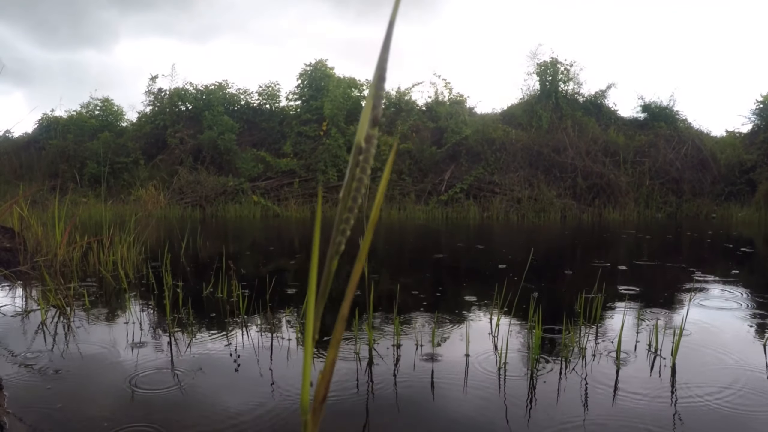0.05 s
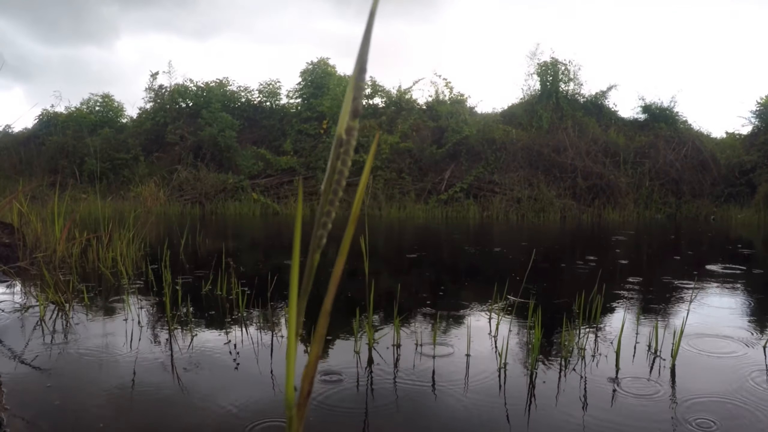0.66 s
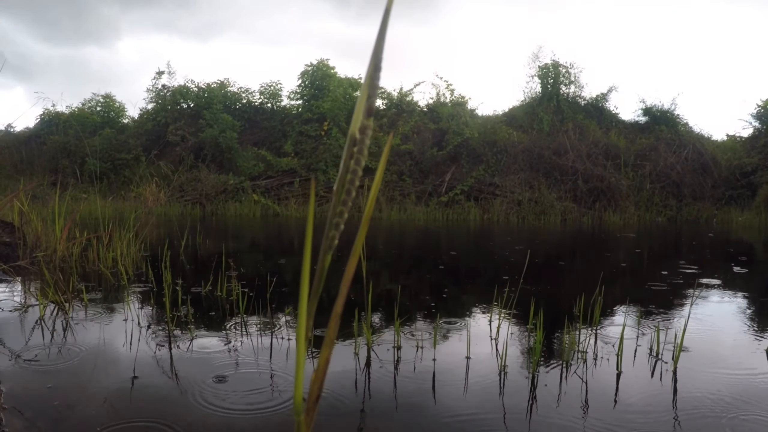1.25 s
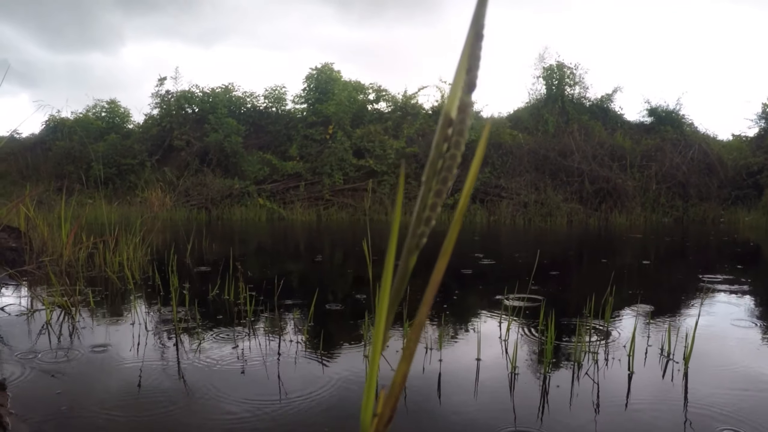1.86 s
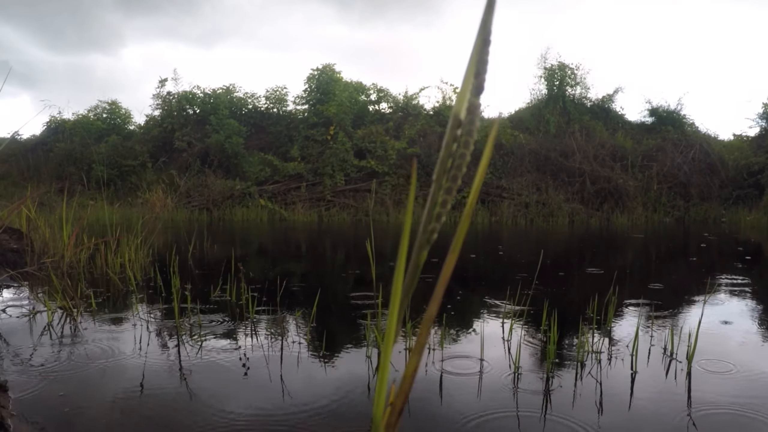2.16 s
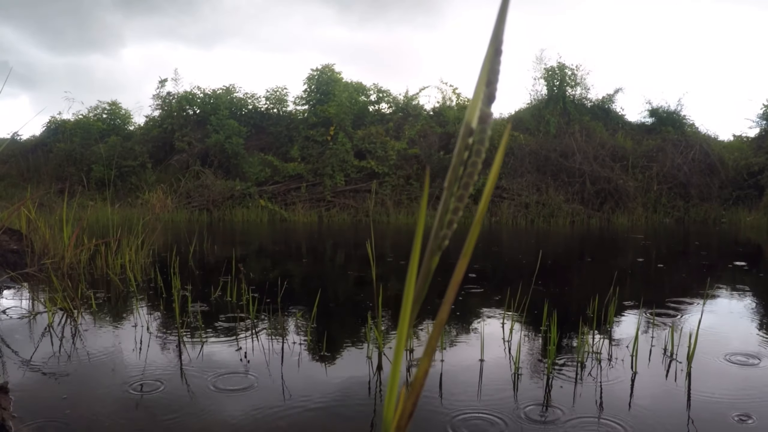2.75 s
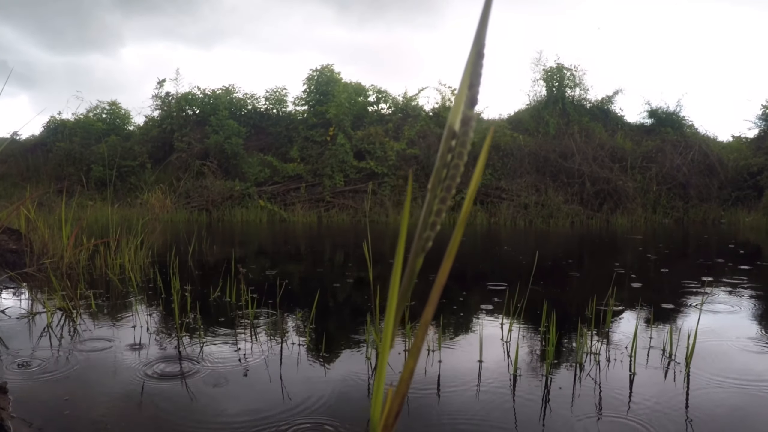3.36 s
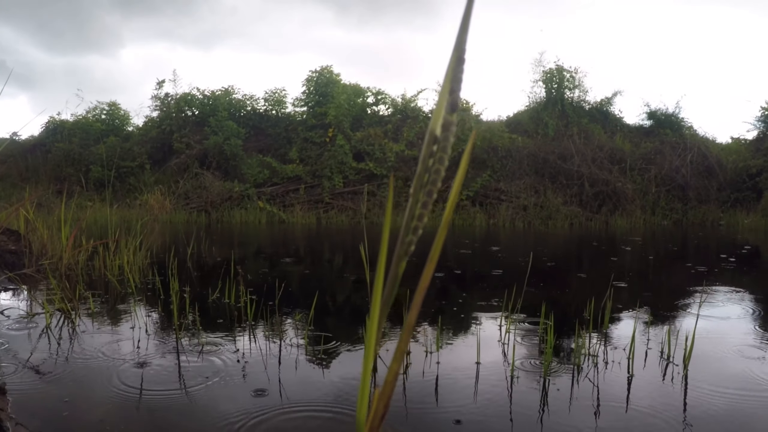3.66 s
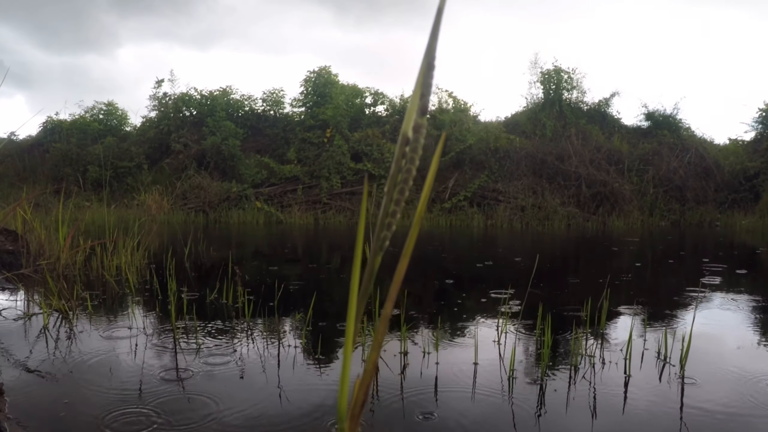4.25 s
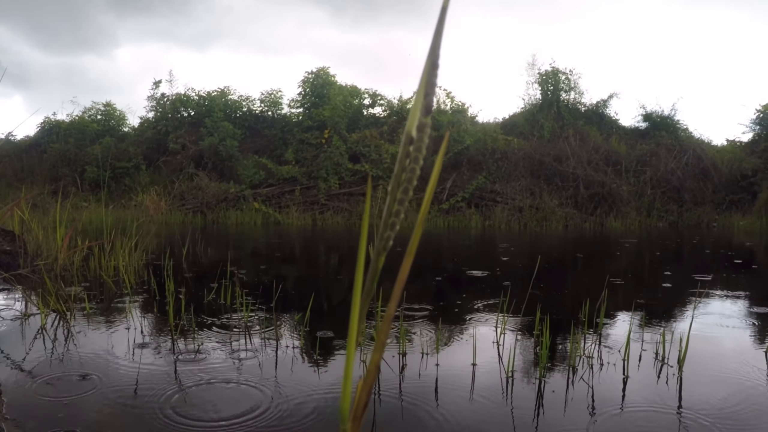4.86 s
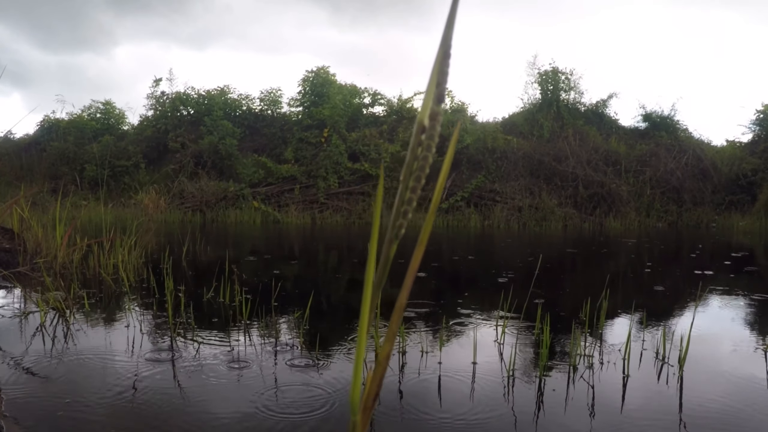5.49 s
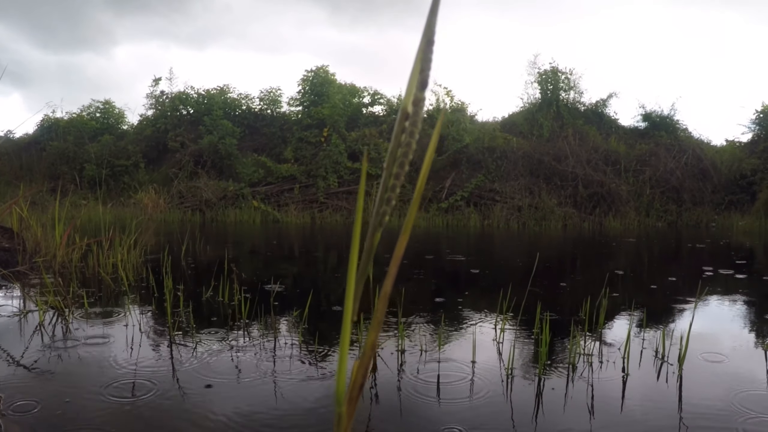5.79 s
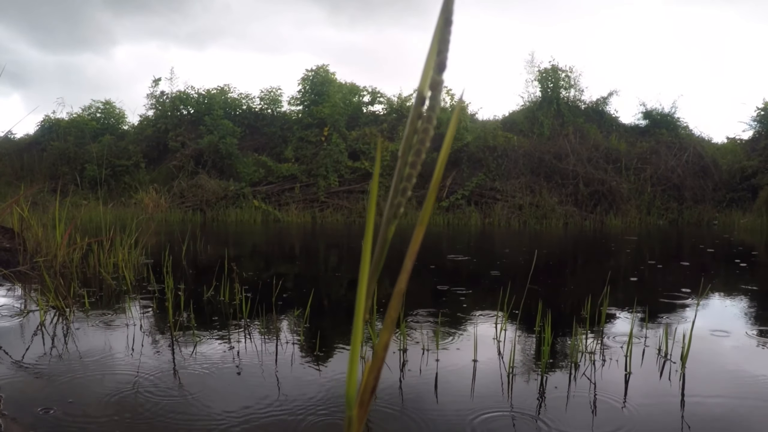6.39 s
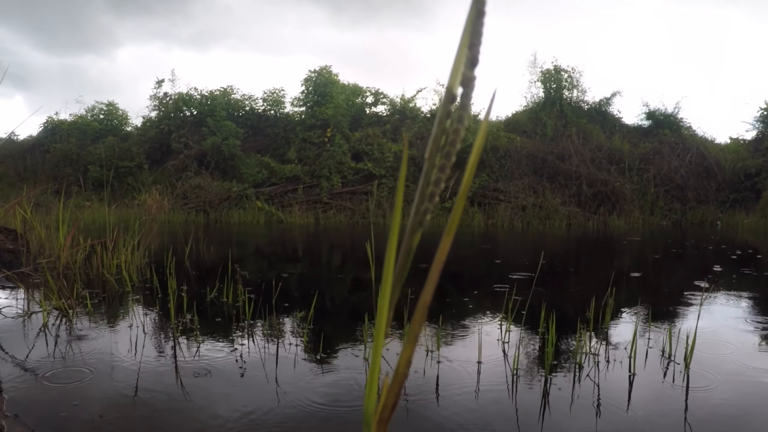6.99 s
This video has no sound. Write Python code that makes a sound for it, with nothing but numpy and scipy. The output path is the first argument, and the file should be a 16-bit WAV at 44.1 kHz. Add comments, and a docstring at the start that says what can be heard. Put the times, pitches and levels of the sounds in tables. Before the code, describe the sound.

Single raindrops plink and splash on a pond close to the microphone, over an even wash of more distant rain. Quiet and sparse at first, with a few papery taps on reeds, the drops soon grow louder and busier and spread out to both sides. A low wind rumble runs underneath, and uneven gusts thump against the microphone, the strongest briefly pushing the rain down.

```python
"""A still pond in light rain, heard from just above the water.
Near drops tick, splash and ring trapped air bubbles; a few tap on reeds; far ones merge into a wash.
A breeze rumbles on the microphone and sheds eddies that thump; the hardest make the limiter duck.
The scene fades in and opens from mono to stereo within the first two seconds."""
import sys
import numpy as np
from scipy import signal
from scipy.fft import rfft, irfft, next_fast_len
from scipy.io import wavfile
from scipy.ndimage import uniform_filter1d, minimum_filter1d, map_coordinates

SR = 44100
rng = np.random.default_rng(int(sys.argv[2]) if len(sys.argv) > 2 else 0)


def digitize_waveform(pressure):
    """Quantize a signal to 16-bit integers and store it at the path in sys.argv[1].

    Rows of a 2-D input are taken as channels; values are limited to [-1, 1].
    """
    field = np.atleast_2d(pressure).T
    bounded = np.clip(field, -1, 1)
    quanta = np.round(bounded * 32767).astype(np.int16)
    wavfile.write(sys.argv[1], SR, quanta)


N = 318843

# strong eddies at the microphone port: t/s, peak/dB, f at peak/Hz, cycles per e-fold of age, ln tail width
STRONG_EDDIES = [(1.709, -5, 110, 1.5, 0.61), (1.722, -17.5, 242, 1.7, 0.65), (1.733, -9, 96, 1.4, 0.4),
                 (2.086, -8.5, 213, 1.06, 0.87), (2.444, 7, 198, 1.23, 0.62), (3.167, -9.5, 165, 1.5, 0.93),
                 (3.178, -12, 133, 2.5, 1), (3.471, -4, 133, 2, 0.59), (3.517, -6, 158, 1.95, 0.49),
                 (3.811, -9, 197, 1.2, 0.7), (3.829, -5, 168, 1.2, 0.79), (4.085, -4.5, 137, 2, 0.44),
                 (4.141, -6.5, 143, 1.4, 0.65), (4.305, -10.5, 192, 2.1, 0.66), (4.595, 2, 330, 1.0, 0.73),
                 (4.64, -3, 184, 1.5, 0.54), (4.69, -15, 222, 1.3, 1), (4.702, -4.5, 232, 1.13, 1),
                 (4.946, -9, 100, 1.5, 0.6), (4.981, -3, 158, 0.82, 1), (5.038, -7.5, 119, 1.8, 0.91),
                 (5.286, -9, 141.5, 1.8, 0.7), (5.316, -6.5, 120, 1.34, 0.8),
                 (5.371, -3.5, 193, 0.68, 0.81), (5.451, -5.5, 347, 3.5, 0.13), (5.46, 7.5, 162, 5.2, 0.11),
                 (5.858, -2, 138, 0.75, 1), (6.089, -1, 177, 1.6, 0.52), (6.651, -9, 147, 1.3, 0.83),
                 (6.955, 3.5, 260, 1.16, 0.72)]


def near_drops():
    """Each drop ticks, splashes and rings a bubble; a weaker one follows as the crater closes."""
    # t/s, bubble f/Hz, relative bubble level/dB, relative tick level/dB
    drops = [(0.026, 2060, -39, -60), (0.128, 2090, -39, -59), (0.155, 1980, -39, -58),
             (0.206, 2110, -37.5, -43), (0.266, 1880, -41, -52), (0.295, 2120, -42, -56),
             (0.334, 2170, -42, -51), (0.424, 1940, -40, -61), (0.458, 2180, -41, -58),
             (0.637, 1690, -42, -37.5), (0.852, 1960, -43, -60), (0.887, 2110, -36, -53),
             (0.903, 2170, -45, -58), (0.972, 2520, -37, -57), (1.036, 2000, -39.5, -37),
             (1.119, 2135, -37, -45), (1.275, 2510, -41, -44), (1.335, 2300, -53, -43),
             (1.412, 2100, -50, -60), (1.515, 2170, -44, -67), (1.715, 2900, -33.5, -36.5),
             (1.723, 3600, -44, -41), (1.756, 2400, -43, -39), (1.845, 2160, -41.5, -32),
             (1.909, 2420, -36, -38.5), (2.056, 2210, -40.5, -42), (2.072, 4700, -39, -34.5),
             (2.198, 2970, -33.5, -37.5), (2.206, 3420, -38, -46), (2.328, 3080, -41, -61),
             (2.339, 3140, -41, -54), (2.355, 3250, -47, -58), (2.404, 2050, -41.5, -58),
             (2.708, 2500, -38, -37), (2.711, 4900, -33, -50.5), (2.73, 4100, -40, -38),
             (2.805, 2270, -52, -34), (2.834, 2960, -42, -56), (2.947, 2170, -42.5, -56),
             (3.01, 2190, -41, -46), (3.093, 2410, -33.5, -45), (3.126, 2170, -58, -37),
             (3.157, 2750, -39, -57), (3.179, 2170, -38.5, -35), (3.222, 4500, -43, -38),
             (3.254, 2840, -46, -38), (3.28, 2750, -41, -37), (3.319, 4740, -40.5, -36.5),
             (3.348, 2650, -44, -40), (3.378, 2300, -44, -53), (3.39, 2170, -35, -36),
             (3.452, 3030, -31.5, -46), (3.461, 3030, -58, -28.5), (3.491, 2600, -44, -54),
             (3.507, 2220, -35, -58), (3.54, 2200, -39.5, -58), (3.575, 2330, -38.5, -53),
             (3.618, 2760, -38, -37), (3.647, 3030, -64, -36), (3.672, 2900, -31.5, -34),
             (3.76, 2600, -36, -57.5), (3.825, 1720, -51, -48), (3.867, 2900, -36.5, -43),
             (3.924, 2180, -30, -32), (3.983, 2680, -41.5, -38.5), (4.006, 3220, -37, -46),
             (4.141, 2540, -62, -26.5), (4.173, 2110, -38, -57.5), (4.299, 2860, -43, -58),
             (4.336, 2950, -41.5, -50), (4.376, 2890, -47, -30), (4.475, 3300, -38.5, -41),
             (4.486, 2760, -41, -39), (4.53, 2380, -44, -52), (4.543, 2540, -39, -40),
             (4.573, 2890, -30, -35), (4.577, 2820, -33, -38), (4.656, 2770, -36.5, -43),
             (4.698, 2540, -47, -36), (4.75, 2390, -34.5, -47), (4.856, 2850, -30.5, -42),
             (4.883, 1890, -62, -34), (4.927, 1890, -37.5, -64), (5.009, 3340, -46, -30.5),
             (5.275, 3130, -39.5, -37), (5.53, 2150, -34, -40), (5.664, 3120, -38.5, -33.5),
             (5.553, 2890, -43, -62), (5.603, 3000, -40, -41), (5.79, 2970, -40, -48),
             (5.841, 3170, -43, -44.5), (5.854, 2900, -44, -51), (5.936, 2500, -46, -29.5),
             (5.957, 2200, -52, -33.5), (6.179, 3140, -51, -25), (6.238, 3010, -33, -35),
             (6.293, 4330, -39, -26), (6.313, 2920, -32.5, -51), (6.327, 2970, -47, -37),
             (6.337, 2830, -38, -48), (6.445, 3840, -44, -36.5), (6.506, 3310, -31.5, -44),
             (6.511, 4570, -38, -54), (6.692, 2450, -52, -27.5), (6.715, 4280, -46, -35),
             (6.824, 3220, -38, -37), (6.898, 2870, -41, -38), (6.991, 3340, -36.5, -28),
             (7.022, 2320, -47, -62), (7.057, 2600, -39, -40), (7.098, 2980, -36, -37),
             (7.15, 3090, -34.5, -35)]
    t_s, hz, bubble_db, tick_db = np.transpose(drops)
    wait, size, tune = rng.random((len(t_s), 3)).T
    slow = (3000 / hz) ** 1.8  # larger, lower bubbles swell and decay more slowly
    first = bubbles(t_s, hz, bubble_db + 7, t60_s=0.014 * slow, rise=0.05, pan_db=4,
                    attack_s=0.0008 * slow)
    fragments = breakup(t_s, hz, bubble_db)
    second = bubbles(t_s + 0.0032 + 0.005 * wait, hz * (0.97 + 0.42 * tune), bubble_db - 7.5 - 7 * size,
                     t60_s=0.0089, rise=0.17, pan_db=10.5, attack_s=0.0012)
    splash = splashes(t_s, 0.64 * bubble_db + 0.46 * tick_db - 5.5, t60_s=0.031)
    tiny = bubbles(t_s + 0.00091, 5200 + 2200 * tune, tick_db + 0.5,
                   t60_s=0.0083, rise=0.37, pan_db=6.5, attack_s=0.0023)
    rings = first + fragments + second + tiny + rebounds(t_s, hz, bubble_db)
    return rings + splash + ticks(t_s, tick_db + 0.5) + spatter(t_s, tick_db)


def bubbles(t_s, hz, db, t60_s, rise, pan_db, attack_s):
    """Trapped air rings briefly; its pitch climbs as it nears the surface."""
    t = np.arange(SR // 30) / SR
    life, glide, pan, lag = rng.standard_normal((len(t_s), 4)).T[:, :, None]
    t60_s, attack_s = np.reshape(t60_s, (-1, 1)), np.reshape(attack_s, (-1, 1))
    age = t / (t60_s * np.exp(0.22 * life))
    pitch_hz = hz[:, None] * (1 + rise * (1 + 0.7 * glide) * (np.minimum(age, 1) - 0.15))
    phase = 2 * np.pi * np.cumsum(pitch_hz, 1) / SR
    envelope = amp(db[:, None] - 60 * age) * (1 - np.exp(-(t / attack_s) ** 2))
    return np.array([placed(t_s, envelope * amp(ear * pan_db * pan) * np.sin(phase + ear * 0.29 * lag))
                     for ear in (1, -1)])


def ticks(t_s, db):
    """The impact itself: a bright tick, different at every drop."""
    # tick partials: f/Hz, relative level/dB, t60/s
    partials = [(4420, -20, 0.02), (5590, -7.5, 0.0094), (6340, 4.5, 0.0041), (7600, -3, 0.0056),
                (9060, 1, 0.0015)]
    hz, partial_db, t60_s = np.transpose(partials)[:, :, None]
    t = np.arange(SR // 80) / SR
    tune, strength, lag = rng.standard_normal((len(t_s), 3, len(partials), 1)).transpose(1, 0, 2, 3)
    start_db = db[:, None, None] + partial_db + 3 + 2.5 * strength
    envelope = amp(start_db - 60 * t / t60_s) * (1 - np.exp(-(t / 0.00083) ** 2))
    phase = 2 * np.pi * hz * (1 + 0.056 * tune) * t
    return np.array([placed(t_s, (envelope * np.sin(phase + ear * 0.5 * lag)).sum(1))
                     for ear in (1, -1)])


def splashes(t_s, db, t60_s):
    """Torn water hisses for an instant at each impact."""
    # hiss spectrum: f/Hz, relative density/dB
    colour = [(1200, 0), (2200, 3), (3000, 3.5), (4500, 1), (6000, -18.5), (7500, -8), (9000, -2.5),
              (14000, -30)]
    t = np.arange(SR // 25) / SR
    envelope = placed(t_s, amp(db[:, None] - 60 * t / t60_s) * (1 - np.exp(-t / 0.00082)))
    return envelope * (1.05 * noise(colour) + 0.25 * np.array([noise(colour), noise(colour)]))


def breakup(t_s, hz, db, count=3):
    """The crater closes on more bubbles of like size, which beat against the first."""
    wait, size, tune = rng.random((len(t_s) * count, 3)).T
    t_s, hz, db = np.repeat([t_s, hz, db], count, axis=1)
    return bubbles(t_s + 0.009 * wait, hz * np.exp(0.18 * (2 * tune - 1)), db + 1.5 - 6 * size,
                   t60_s=0.0059, rise=0.062, pan_db=4, attack_s=0.00066)


def rebounds(t_s, hz, db):
    """The jet thrown up by a drop falls back and rings a soft, slightly higher bubble."""
    wait, tune = rng.random((len(t_s), 2)).T
    return bubbles(t_s + 0.004 + 0.018 * wait, hz * (1 + 0.1 * tune), db - 14,
                   t60_s=0.012, rise=0.028, pan_db=-4, attack_s=0.0025)


def spatter(t_s, db):
    """Droplets torn from the splash crown land a moment later and tick."""
    wait, size = rng.random((len(t_s), 2)).T
    return ticks(t_s + 0.0024 + 0.031 * wait, db - 9 - 8 * size)


def far_drops(count=780):
    """Drops all over the pond ring, tick and splash: many faint, a few clearer."""
    when, size, tune, sharp = rng.random((count, 4)).T
    t_s = shower_times(when)
    db = -50 + 10 * size ** 2
    hz = 2817 * np.exp(0.106 * rng.standard_normal(count))
    rings = bubbles(t_s + 0.002887 * tune, hz, db, t60_s=0.014, rise=0.025, pan_db=2.5, attack_s=0.0018)
    return rings + ticks(t_s, db - 9 + 11 * sharp) + splashes(t_s, db - 14.5, t60_s=0.032)


def patter(count=600):
    """Small drops further out each ring a brief bubble; the water simmers."""
    when, size = rng.random((count, 2)).T
    hz = 2800 * np.exp(0.13 * rng.standard_normal(count))
    return bubbles(shower_times(when), hz, -48 + 5 * size,
                   t60_s=0.011, rise=0.042, pan_db=3, attack_s=0.0017)


def low_plinks(count=210):
    """Distant bubbles, lower and longer; they thin out over time."""
    when, size, tune = rng.random((count, 3)).T
    return bubbles(when ** 1.25 * N / SR, 1830 + 495 * tune, -43.5 + 6 * size ** 2,
                   t60_s=0.03, rise=0.016, pan_db=0, attack_s=0.0027)


def spray(count=300):
    """Fine droplets fall back and ring very small bubbles."""
    when, size, tune = rng.random((count, 3)).T
    return bubbles(shower_times(when), 5000 + 3300 * tune, -52 + 7 * size ** 2,
                   t60_s=0.011, rise=0.28, pan_db=8.5, attack_s=0.0025)


def reed_taps(t60_s=0.024, log_width=0.2):
    """A drop on a reed blade gives a dull, papery tap."""
    # t/s, f/Hz, level/dB
    taps = [(0.238, 4200, -43), (0.638, 3030, -36.5), (0.97, 3530, -37), (1.074, 695, -29.5),
            (1.073, 1140, -41), (1.273, 3570, -39), (1.312, 825, -36.5), (6.166, 1670, -34)]
    t = np.arange(SR // 15) / SR
    out = np.zeros(N)
    for t_s, hz, db in taps:
        band = filtered(rng.standard_normal(N), lambda f: bell(np.log((f + 1) / hz), log_width))
        envelope = amp(db - 60 * t / t60_s) * (1 - np.exp(-t / 0.0014))
        out += unit(band) * placed(np.array([t_s]), envelope[None])
    return out


def housing_snaps(count=70, t60_s=0.0074, pan_db=2):
    """Spray lands on the microphone housing with dry, bright snaps, mostly faint."""
    # distinct hits: t/s, level/dB
    hits = [(4.831, -38), (5.178, -43), (6.205, -44), (6.293, -51), (6.692, -43)]
    # snap spectrum: f/Hz, relative density/dB
    colour = [(2500, -16), (6000, 0), (10000, -2), (15000, -17)]
    when, size = rng.random((count, 2)).T
    faint_hits = [shower_times(when), -54 + 9 * size ** 2]
    t_s, db = np.hstack([np.transpose(hits), faint_hits])
    t = np.arange(SR // 100) / SR
    envelope = placed(t_s, amp(db[:, None] - 60 * t / t60_s))
    return envelope * np.array([noise(colour), noise(colour)]) * amp([[pan_db], [-pan_db]])


def wind(count=60):
    """Pressure on one microphone port comes out opposed in the two channels, stronger on the left."""
    # breeze strength, one gust: t/s, relative level/dB
    breeze = [(0, -24.5), (.35, -21), (.55, -25.5), (1.2, -24), (2, -21.5), (4.15, -19.5), (4.36, -13.5),
              (4.6, -17.5), (5.8, -20.5), (7.2, -17.5)]
    # rumble spectrum: f/Hz, relative density/dB
    colour = [(8, 1), (22, 0.5), (40, 2.5), (60, -1), (100, -10.5), (160, -15.5), (250, -29.5),
              (400, -46.5), (800, -44), (2000, -94)]
    # wind inverted on the right: f/Hz, share
    opposed = [(60, .48), (125, .55), (250, .68), (500, .85), (1000, .92)]
    strength = amp(curve(breeze))
    rumble = strength * amp(3.5 + 2.45 * wobble(13)) * noise(colour)
    when, size, tune = rng.random((count, 3)).T
    t_s = when * N / SR
    small_db = np.interp(t_s, *np.transpose(breeze)) - 4 + 9 * size
    small_eddies = eddies(t_s, small_db, 86.9 + 86.5 * tune, cycles=1.83, log_width=0.86)
    left = rumble + small_eddies + eddies(*np.transpose(STRONG_EDDIES)) + wakes()
    right = -filtered(left, lambda hz: along(opposed, hz)) + strength * amp(-6) * noise(colour)
    return np.array([left, right]) + puffs()


def eddies(t_s, db, hz, cycles, log_width):
    """An eddy hits the port as a quick flutter that slows into a thump."""
    lead_s = cycles / hz
    log_width = np.reshape(log_width, (-1, 1))
    log_age = np.log((np.arange(SR // 14) + 1) / SR / lead_s[:, None])  # 0 at the peak
    width = np.where(log_age < 0, np.minimum(log_width, 0.34), log_width)
    envelope = amp(db)[:, None] * bell(log_age, width)
    phase = 2 * np.pi * (np.reshape(cycles, (-1, 1)) * log_age + rng.random((len(t_s), 1)))
    return placed(t_s - lead_s, envelope * np.sin(phase))


def wakes(delay_s=0.0012, sigma_s=0.0075):
    """Each strong eddy travels in a short patch of churning air."""
    # turbulence spectrum: f/Hz, relative density/dB
    colour = [(40, -0.5), (110, 0.5), (220, -13.5), (400, -20), (800, -29), (2000, -71)]
    t_s, db = np.transpose(STRONG_EDDIES)[:2]
    t = np.arange(SR // 12) / SR
    patches = amp(np.minimum(db, 0) - 15.5)[:, None] * bell(t - t.mean(), sigma_s)
    return placed(t_s + delay_s - t.mean(), patches) * noise(colour)


def puffs(sigma_s=0.0015, opposed=0.79):
    """Hard eddies break into crackling puffs of finer turbulence."""
    # t/s, level/dB
    bursts = [(2.441, -14), (4.402, -30), (4.452, -24), (4.593, -30), (5.446, -32), (5.453, -13),
              (5.459, -6)]
    # puff spectrum: f/Hz, relative density/dB
    colour = [(150, -36), (400, 6.5), (900, 3), (1400, -4.5), (2300, -14), (2900, -23), (4000, -51),
              (6000, -60)]
    t_s, db = np.transpose(bursts)
    t = np.arange(SR // 100) / SR
    envelope = placed(t_s - t.mean(), amp(db)[:, None] * bell(t - t.mean(), sigma_s))
    return envelope * noise(colour) * np.array([[1], [-opposed]])


def bank_echo(x):
    """Reeds and bank scatter a short, diffuse tail."""
    # tail decay: f/Hz, t60/s
    decay = [(1000, 0.44), (3000, 0.08), (9000, 0.35)]
    hz, t, spectra = signal.stft(rng.standard_normal((2, SR // 4)), SR, nperseg=256)
    tail = signal.istft(spectra * amp(-60 * t / along(decay, hz)[:, None]), SR, nperseg=256)[1]
    return signal.fftconvolve(x, tail / np.linalg.norm(tail[0]), axes=1)[:, :N]


def wash():
    """Countless far drops merge into a steady, wide hiss."""
    # spectra common to both ears and opposed between them: f/Hz, relative density/dB
    mid_colour = [(100, 10.5), (250, 17), (400, 13.5), (700, 7), (1200, 3), (2200, -0.5), (3000, -5.5),
                  (4500, -7), (6500, -7), (8500, -7.5), (10500, -8.5), (12500, -16.5), (15000, -28)]
    side_colour = [(100, 14), (400, 19.5), (700, 13.5), (1200, 14.5), (2200, 1.5), (3000, -2), (4500, -5.5),
                   (6500, -2.5), (8500, -4.5), (10500, -5), (12500, -12), (15000, -26)]
    mid = amp(-50) * noise(mid_colour)
    side = amp(-48.5) * noise(side_colour)
    return np.array([mid + side, mid - side]) * amp(0.35 * wobble(1.8) + 0.75 * wobble(25))


def shower_times(when):
    """Map draws of 0-1 to times in s; the shower thickens, then eases."""
    # t/s, relative drop rate
    shower = [(0, 0.1), (1.4, 0.3), (2.0, 0.9), (3.2, 1.7), (5.0, 1.1), (7.2, 1.3)]
    fallen = np.cumsum(curve(shower))
    return np.searchsorted(fallen, when * fallen[-1]) / SR


def ports(x, tilt_db=1.1):
    """The two microphone ports shift the phase of sound from the water; the right is louder."""
    # f/Hz, phase lead of right over left/rad
    lead = [(1200, -1.5), (2200, -2.5), (2900, -1.5), (3600, 0.5), (4400, -5.5), (5300, 0), (6200, 5),
            (7400, 0), (9000, -5)]
    shifted = filtered(x, lambda hz: np.exp(0.5j * np.outer([-1, 1], along(lead, hz))))
    return shifted * amp([[-tilt_db], [tilt_db]])


def limiter(x, ceiling_db, recovery_db_per_s):
    """The gain drops at once under a peak and creeps back."""
    excess_db = np.maximum(20 * np.log10(np.abs(x).max(0) + 1e-9) - ceiling_db, 0)
    ramp_db = recovery_db_per_s * np.arange(N) / SR
    cut_db = np.maximum.accumulate(excess_db + ramp_db) - ramp_db
    return x * uniform_filter1d(minimum_filter1d(amp(-cut_db), size=221), size=221)


def widen(x, start_s=1.39, span_s=0.55, full_width=0.94):
    """Mono that favours the left port opens to stereo."""
    # side signal kept in mono: f/Hz, share
    leak = [(60, 0.057), (150, 0.4), (350, 0.71), (700, 0.3), (1200, 0.06), (3000, 0.97), (10000, 0.021)]
    mid, side = (x[0] + x[1]) / 2, (x[0] - x[1]) / 2
    width = full_width * np.clip((np.arange(N) / SR - start_s) / span_s, 0, 1)
    centre = mid + (1 - width) * filtered(side, lambda hz: along(leak, hz))
    return np.array([centre + width * side, centre - width * side])


def amp(db):
    """dB to gain."""
    return 10 ** (np.asarray(db) / 20)


def unit(x):
    """Scale to rms 1."""
    return x / np.sqrt(np.mean(x ** 2) + 1e-20)


def bell(x, sigma):
    """Gaussian of peak 1."""
    return np.exp(-0.5 * (x / sigma) ** 2)


def along(points, hz):
    """Interpolate (f/Hz, value) points on a log axis."""
    f, value = np.transpose(points)
    return np.interp(np.log(hz + 1), np.log(f + 1), value)


def curve(rows):
    """Interpolate (t/s, value) rows at every sample."""
    return np.interp(np.arange(N) / SR, *np.transpose(rows))


def wobble(rate_hz):
    """Smooth random curve, rate_hz knots a second."""
    knots = rng.standard_normal(int(N * rate_hz / SR) + 4)
    return map_coordinates(knots, [np.arange(N) * rate_hz / SR])


def filtered(x, response):
    """Apply a complex frequency response."""
    size = next_fast_len(N + SR // 2)
    return irfft(rfft(x, size) * response(np.fft.rfftfreq(size, 1 / SR)), size)[..., :N]


def noise(colour):
    """Noise of rms 1, shaped by (f/Hz, level/dB) points."""
    return unit(filtered(rng.standard_normal(N), lambda hz: amp(along(colour, hz))))


def placed(t_s, sounds):
    """Sum one row of samples per event, each from its start time."""
    index = np.round(t_s * SR).astype(int)[:, None] + np.arange(sounds.shape[1])
    return np.bincount(index[index >= 0], sounds[index >= 0], N)[:N]


def scene():
    """Rain on water, reeds and housing, with wash and breeze."""
    water = near_drops() + far_drops() + patter() + spray() + low_plinks()
    drops = ports(water) + reed_taps()
    return drops + amp(-10) * bank_echo(drops) + housing_snaps() + wash() + wind()


def record(dry, top_hz=15100):
    """Limiter, stereo width, fade-in, band limit."""
    # fade-in: t/s, gain/dB
    fade = [(0, -22), (.5, -16.5), (1, -8), (1.5, -3), (2, -2.5)]
    held = limiter(dry, ceiling_db=2, recovery_db_per_s=6.5)
    faded = widen(held) * amp(curve(fade))
    return filtered(faded, lambda hz: hz < top_hz)


dry = scene()
out = record(dry)
digitize_waveform(out)
```